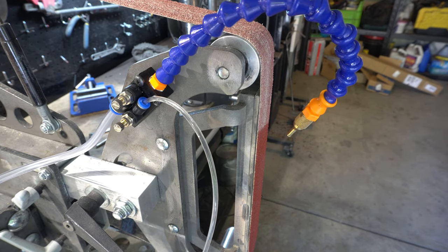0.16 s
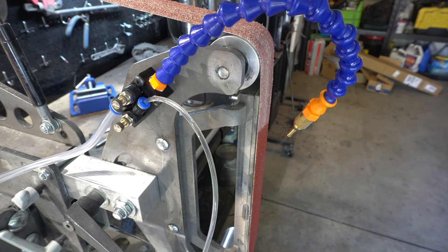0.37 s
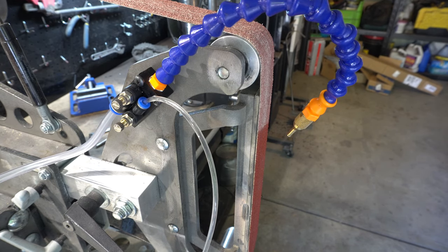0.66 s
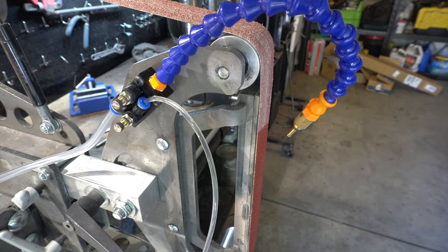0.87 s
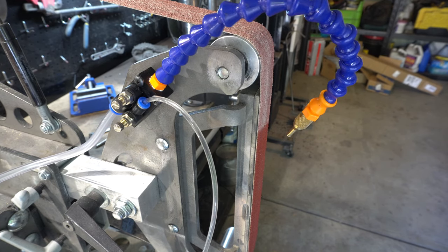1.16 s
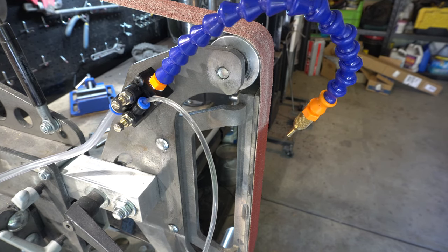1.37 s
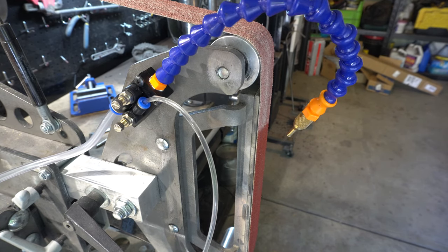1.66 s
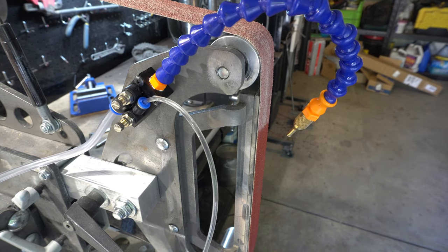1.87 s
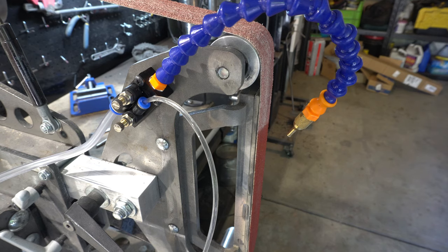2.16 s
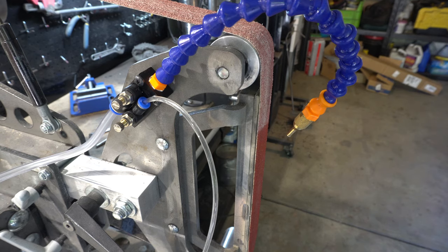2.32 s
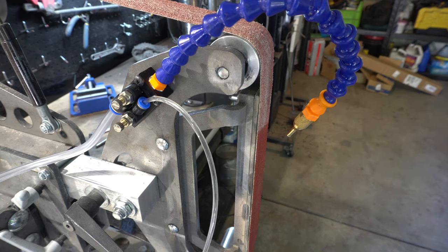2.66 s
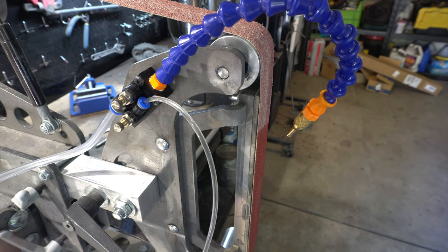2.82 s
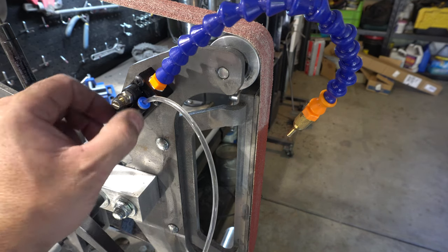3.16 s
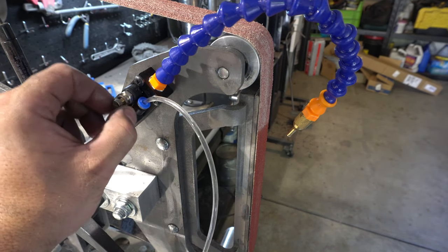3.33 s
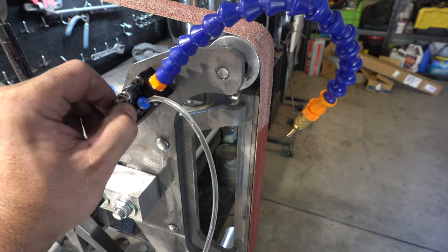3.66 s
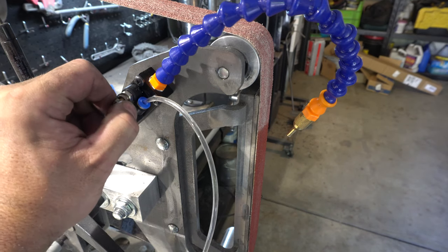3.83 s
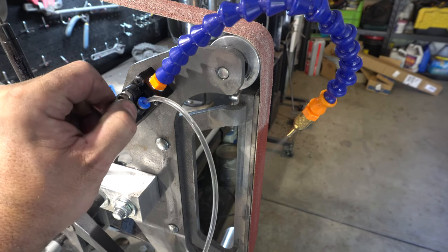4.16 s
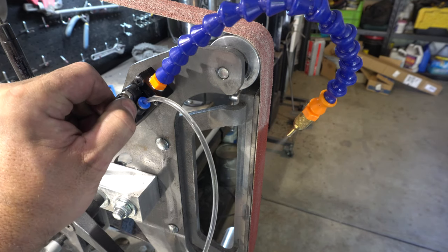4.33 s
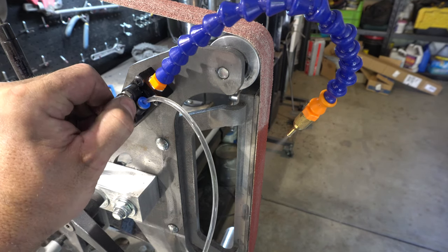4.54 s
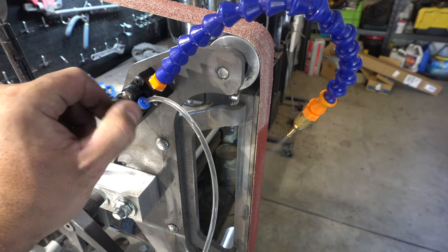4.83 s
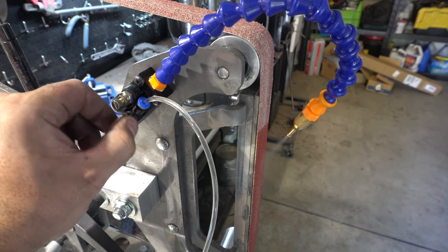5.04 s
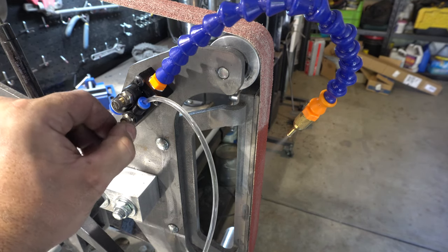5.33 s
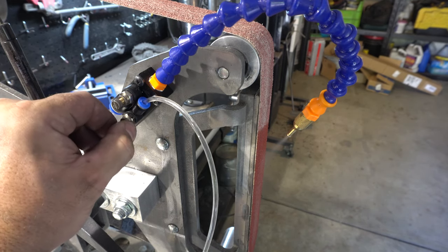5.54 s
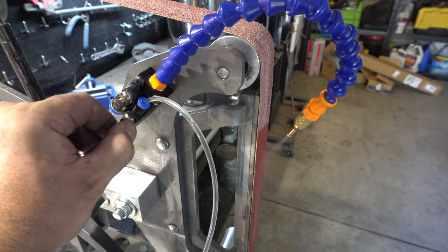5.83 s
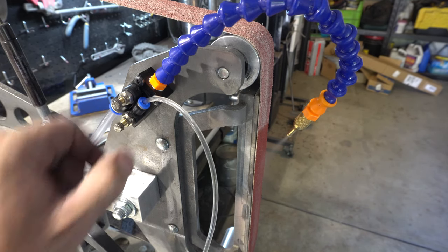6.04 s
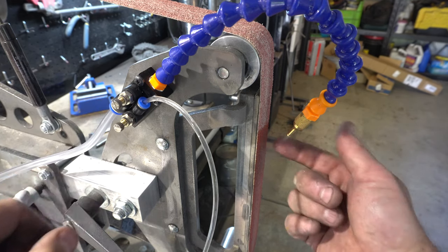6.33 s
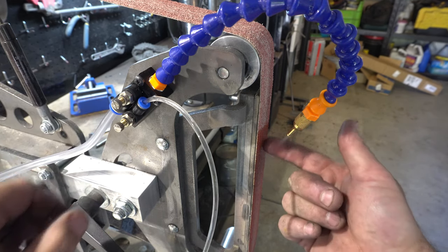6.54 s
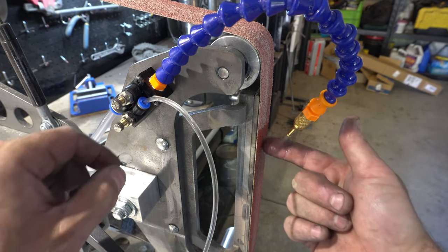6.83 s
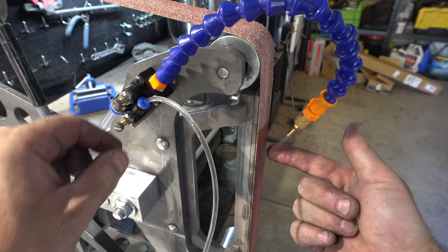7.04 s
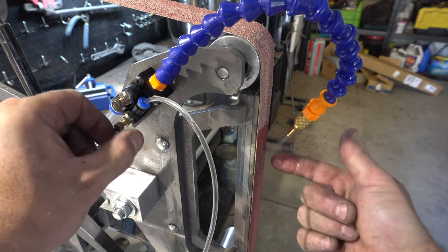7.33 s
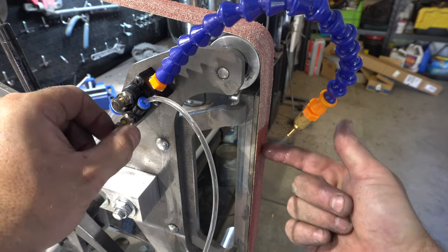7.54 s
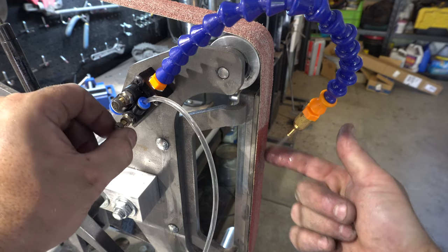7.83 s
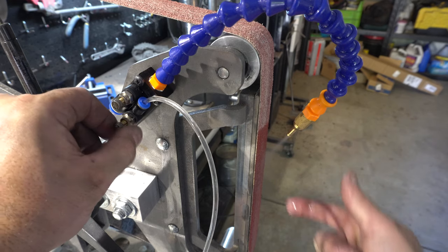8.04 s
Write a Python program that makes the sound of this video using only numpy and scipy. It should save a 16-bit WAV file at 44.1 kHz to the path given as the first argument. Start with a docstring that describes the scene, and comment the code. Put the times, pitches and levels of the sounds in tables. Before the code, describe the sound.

Close, continuous high air-spray hiss gets a touch sharper, then a finger held in the jet adds lower, uneven rushing and small puffs.

```python
"""A steady, bright hiss, a little stronger for its first moment: a compressed-air mister beside an idle belt
grinder in a workshop, heard at two microphone ports. It is noise coloured by jet spectra, and the steel frame
adds close echoes and a faint pipe-like ring. A hand turns the valve and the hiss brightens; then a fingertip
held in the spray adds a lower, fluttering rush of resonant noise, with puffs and flares.
Underneath lie noise rumble and air, two weak sine hums, arm rustle and soft handling bumps."""
import sys
import numpy as np
from scipy.fft import rfft, irfft, next_fast_len
from scipy.io import wavfile
from scipy.ndimage import map_coordinates

SR = 44100
rng = np.random.default_rng(int(sys.argv[2]) if len(sys.argv) > 2 else 0)


def transcribe(signal):
    """Save signal, clipped to [-1, 1], as a 16-bit WAV file at the path in sys.argv[1]."""
    frames = np.atleast_2d(signal).T
    limited = np.clip(frames, -1, 1)
    pcm = np.round(limited * 32767).astype(np.int16)
    wavfile.write(sys.argv[1], SR, pcm)


N = 360861
FFT_SIZE = next_fast_len(N)
TIME = np.arange(N) / SR   # s
HZ = np.arange(FFT_SIZE // 2 + 1) * SR / FFT_SIZE

# Low workshop rumble, and room air close by; spectra before band limits: pitch_hz [Hz], level_db [dB per Hz]
RUMBLE_SPECTRUM = [(15, -1), (30, -4), (50, -3), (90, -5), (130, -4.5), (190, -20), (400, -18)]
AIR_SPECTRUM = [(40, -24), (130, -12), (185, -2.5), (290, 1.5), (380, -1), (560, -6.5), (1000, -53),
                (3000, -54)]
# Swells of the hum above its faint steady level: middle_s [s], half_length_s [s], level_db [dB]
HUM_SWELLS = [(.35, 0.22, -67), (2.35, 0.13, -58), (3.62, 0.53, -55.5), (7.95, .3, -61)]
# Sleeve and hand moving: middle_s [s], half_length_s [s], level_db [dB]
RUSTLES = [(2.13, 0.053, -57), (3.1, 0.095, -62), (3.42, 0.25, -49.5), (5.05, 0.091, -59),
           (6.22, 0.25, -56), (7.41, 0.045, -56), (7.95, 0.053, -54)]
# Spectrum of that rustle before band limits: pitch_hz [Hz], level_db [dB per Hz]
RUSTLE_SPECTRUM = [(120, -31), (220, -5), (290, -0.5), (400, -6.5), (700, -10.5), (1300, -12), (2500, -41)]
# Soft handling bumps: start_s [s], level_db [dB]
BUMPS = [(1.0, -58), (2.04, -48), (3.03, -55), (3.95, -57)]
# Stereo width at the two ports: pitch_hz [Hz], side_minus_mid_db [dB]
STEREO_WIDTH = [(500, -27), (950, -35), (1350, -11.5), (1900, -27), (2700, -19.5), (3350, -14.5),
                (3900, -21), (4600, -13), (5750, -6.5), (6700, -8), (8050, -5), (10300, -4), (12600, -8),
                (13600, -8), (15500, -6)]
# Phase by which the right port leads: pitch_hz [Hz], lead_rad [radians]
PORT_LEAD = [(4800, 0), (5700, 0), (6700, 0.6), (7500, .4), (8050, 1), (9000, 0.77), (12300, 1.6),
             (13300, 1.7), (14300, 1.35), (15700, 1.56)]
# Balance of the spray: pitch_hz [Hz], left_minus_right_db [dB]
PORT_BALANCE = [(500, 0.8), (3200, -1.5), (4300, -0.2), (7800, 0), (8500, -2), (10200, -1), (13100, -2.5),
                (13900, -1.5), (15700, -2.5)]
# Near reflections, 0.5 to 2.8 m of extra path: delay_s [s], strength [gain against the direct sound]
NEAR_ECHOES = [(.002783, .2), (.00144, .04), (.008115, .06)]
# Resonances (and hollows, below 0 dB) between the frame plates: pitch_hz [Hz], width_hz [Hz], boost_db [dB]
FRAME_MODES = [(2980, 14, 7.5), (4090, 41, -6.5), (4300, 13, 4), (4745, 31, -0.5), (6100, 76, 3.5),
               (6640, 52, 8), (7000, 51, 3.5), (7040, 55, 0), (8160, 61, -3.5), (13500, 55, -3)]
# Resonances and hollows of the gap between hand and frame: pitch_hz [Hz], width_hz [Hz], boost_db [dB]
HAND_MODES = [(384, 85, 18), (920, 170, 6.5), (1480, 99, -7.5), (1700, 360, 5.5), (2830, 450, 2.5),
              (3643, 160, 5), (5400, 120, 1.5), (8100, 330, -0.5), (9900, 2800, 1.5), (13200, 500, 1),
              (15400, 1500, -3.5)]
# Resonances and hollow of the gap between nozzle and finger: pitch_hz [Hz], width_hz [Hz], boost_db [dB]
FINGER_MODES = [(3100, 320, 7), (3650, 150, 8), (5900, 280, -5)]
# Hollow heard just after the finger slips out: pitch_hz [Hz], width_hz [Hz], boost_db [dB]
SLIP_HOLLOW = [(2400, 1200, -4.5)]
# The free jet, and the jet broken by a finger; spectra before band limits: pitch_hz [Hz], level_db [dB per Hz]
FREE_JET = [(290, -45), (500, -28.5), (943, -24.5), (1280, -19), (1410, -17), (1540, -15), (1940, -10),
            (2110, -7.5), (4170, -0.5), (5970, -3), (7210, -4.5), (9340, -2.5), (12500, -1), (14800, 0.5),
            (15700, 1)]
BROKEN_JET = [(290, -56), (500, -26), (930, -10), (1300, -15), (1470, -4), (1910, -1), (3450, -11),
              (3710, -5), (4110, -3.5), (5800, -3.5), (6510, -4), (8570, -3.5), (10500, -2), (14200, -1),
              (15700, -3)]
# Finger in the spray: enter_s [s, middle of the move], leave_s [s, same], share [0-1 of the jet it breaks]
FINGER = [(6.32, 7.41, 0.96), (7.494, 7.937, 0.94)]
# Resonances of the rush on the fingertip, relative levels: pitch_hz [Hz], width_hz [Hz], level_db [dB]
RUSH_MODES = [(375, 79, -7), (928, 360, 1.5), (1266, 190, 1.5), (1660, 270, 2)]
# Puffs as the fingertip crosses the core of the jet: middle_s [s], half_length_s [s], level_db [dB]
PUFFS = [(6.3, 0.015, -50), (6.46, 0.019, -45.5), (7.35, 0.15, -48.5), (7.55, 0.032, -48.5),
         (7.78, 0.033, -45.5), (7.925, 0.022, -40.5)]
# Bands that flare as the finger changes its angle to the jet, levels before a common trim:
# middle_s [s], half_length_s [s], pitch_hz [Hz], width_hz [Hz], level_db [dB]
FLARES = [(6.358, 0.025, 4400, 2800, -22.5), (6.445, 0.019, 1850, 500, -32.5),
          (6.543, 0.038, 4120, 1500, -24.5), (6.62, 0.076, 2290, 905, -35), (6.85, 0.19, 13500, 800, -27),
          (7.18, 0.13, 10100, 1000, -25), (7.42, 0.065, 5450, 500, -29), (7.76, .12, 10650, 350, -28)]

# Background: the lull is when rumble and diffuse air die down, and stay lower
LULL_S, LULL_FADE_S = 4.08, 0.67
RUMBLE_DB, RUMBLE_DROP_DB = -56, 8
DIFFUSE_DB, DIFFUSE_DB_PER_S, DIFFUSE_DROP_DB = -65.5, 1.5, 35   # grows slowly until the lull
HUM_HZ, HUM_DB, FAN_HZ, FAN_DB = 63.7, -71.5, 87, -68
NEAR_AIR_DB = -63
BUMP_DECAY_S = 0.07
# Hand and finger: middles and lengths of their moves
HAND_S, HAND_APPROACH_S = 3.84, 2.1   # the hand cups the valve and colours the hiss
VALVE_S, VALVE_TURN_S = 3.78, 0.55
ENTER_S, LEAVE_S, SLIP_S = 0.35, 0.068, 0.11   # lengths only
RUSH_DB, RUSH_DB_PER_S = -45, 0.3   # at the first entry, and growth as the finger closes in
FLARE_TRIM_DB = -2
# Jet before the valve is turned, what opening it adds, and what the finger near the nozzle takes
HISS_DB, OPEN_HISS_DB, FINGER_HISS_LOSS_DB = -28.5, 0.6, 1.3
SIZZLE_DB, OPEN_SIZZLE_DB, FINGER_SIZZLE_LOSS_DB = -25.5, 2.08, 1.54
START_DB, SETTLE_S = 1.6, 0.18   # the hiss begins a little stronger and settles
CLUTTER = .26   # strength of the weak echoes around the frame, against the direct sound
CUTOFF_HZ = 15780


def from_db(db):
    """Turn decibels into gain."""
    return 10 ** (np.asarray(db) / 20)


def rms_one(x):
    """Scale to unit power."""
    return x / np.sqrt(np.mean(x ** 2) + 1e-20)


def at_hz(points):
    """Join a table's points on a log-frequency axis."""
    hz, value = np.transpose(points)
    return np.interp(np.log(HZ + 1), np.log(hz), value)


def filtered(x, gain):
    """Apply a frequency response."""
    return irfft(rfft(x, FFT_SIZE) * gain, FFT_SIZE)[..., :N]


def band(low_hz, high_hz, order=8):
    """Band-pass response, steeper with higher order."""
    low_cut = 1 + (low_hz / (HZ + 1)) ** (2 * order)
    high_cut = 1 + (HZ / high_hz) ** (2 * order)
    return 1 / np.sqrt(low_cut * high_cut)


def bell(hz, width):
    """Bell-shaped response of one resonance, 1 at its centre."""
    return 1 / (1 + (2 * (HZ - hz) / width) ** 2)


def boosts(modes):
    """Response of resonances and hollows standing on a flat base."""
    return from_db(sum(db * bell(hz, width) for hz, width, db in modes))


def drift(rate_hz):
    """Slow random movement with spread 1, made of low-passed noise."""
    return rms_one(filtered(rng.standard_normal(N), 1 / (1 + (HZ / rate_hz) ** 2)))


def ramp(middle_s, length_s):
    """A smooth move from 0 to 1."""
    return .5 + .5 * np.sin(np.pi * np.clip((TIME - middle_s) / length_s, -.5, .5))


def swells(rows):
    """Gain of a row of soft, bell-shaped swells."""
    return sum(from_db(db) * np.exp(-.5 * ((TIME - s) / half) ** 2) for s, half, db in rows)


def turbulence(gain, scatter=0):
    """Stereo noise of a given colour; its side part follows the width table plus any scatter; rms 1."""
    side_gain = gain * np.hypot(from_db(at_hz(STEREO_WIDTH)), scatter)
    mid, side = filtered(rng.standard_normal((2, N)), [gain, side_gain])
    return rms_one(np.array([mid + side, mid - side]))


def rumble_and_hum(lull):
    """Low noise that drops at the lull, with two sine hums whose phase wavers."""
    rumble = rms_one(filtered(rng.standard_normal(N), from_db(at_hz(RUMBLE_SPECTRUM)) * band(11, 400, order=2)))
    rumble = rumble * from_db(RUMBLE_DB - RUMBLE_DROP_DB * lull)
    # sqrt(2) gives the sines rms 1
    hum = np.sqrt(2) * np.sin(2 * np.pi * HUM_HZ * TIME + .5 * drift(1.8))
    fan = np.sqrt(2) * np.sin(2 * np.pi * FAN_HZ * TIME + 1.2 * drift(4))
    return rumble + hum * (from_db(HUM_DB) + swells(HUM_SWELLS)) + fan * from_db(FAN_DB)


def room_air(lull):
    """Near air as steady noise, and diffuse air as independent noise at each port."""
    near = from_db(NEAR_AIR_DB) * turbulence(from_db(at_hz(AIR_SPECTRUM)) * band(65, 3000, order=2))
    diffuse = rms_one(filtered(rng.standard_normal((2, N)), band(160, 990, order=2)))
    growth_db = DIFFUSE_DB_PER_S * np.minimum(TIME, LULL_S)
    return near + diffuse * from_db(DIFFUSE_DB + growth_db - DIFFUSE_DROP_DB * lull)


def arm_rustle():
    """Sleeve and hand rubbing: soft swells of low-mid noise."""
    return swells(RUSTLES) * turbulence(from_db(at_hz(RUSTLE_SPECTRUM)) * band(120, 2500, order=2))


def workshop():
    """The background: rumble, hums, room air and the rustle of an arm."""
    lull = ramp(LULL_S, LULL_FADE_S)
    return rumble_and_hum(lull) + room_air(lull) + arm_rustle()


def bumps():
    """Dull noise knocks that start at once and die quickly."""
    level = sum(from_db(db) * (TIME > s) * np.exp(-np.abs(TIME - s) / BUMP_DECAY_S) for s, db in BUMPS)
    return level * turbulence(band(170, 1200, order=3))


def frame(x, scatter_s=0.011, count=60):
    """The frame returns clear and weak echoes and rings; the ports differ in level and phase."""
    clutter = np.zeros(FFT_SIZE)
    delay_s = rng.uniform(.003, .025, count)   # about 1 to 8.5 m of extra path
    strength = rms_one(rng.standard_normal(count) * np.exp(-delay_s / scatter_s)) / np.sqrt(count)
    clutter[(delay_s * SR).astype(int)] = strength
    clear = sum(g * np.exp(-2j * np.pi * HZ * s) for s, g in NEAR_ECHOES)
    echoes = 1 + CLUTTER * rfft(clutter) + clear
    sides = np.array([[.5], [-.5]])   # left, right
    ports = from_db(at_hz(PORT_BALANCE) * sides) * np.exp(-1j * at_hz(PORT_LEAD) * sides)
    return filtered(x, echoes * boosts(FRAME_MODES) * ports)


def mirrored(x, strength, delay_s, sway_s, rate_hz):
    """Add a reflection from skin that never holds still, so its notches wander; offset the added power."""
    late_s = TIME - delay_s - sway_s * drift(rate_hz)
    echo = np.array([map_coordinates(channel, [late_s * SR], order=3, mode="nearest") for channel in x])
    return (x + strength * echo) / np.sqrt(1 + strength ** 2)


def finger_share():
    """Share of the jet that the finger breaks, 0-1."""
    visits = [share * ramp(enter, ENTER_S) * (1 - ramp(leave, LEAVE_S)) for enter, leave, share in FINGER]
    return np.clip(sum(visits), 0, 1)


def slipping():
    """Weight 0-1 of the moments when the finger lies just beside the jet."""
    return sum(ramp(leave, LEAVE_S) * (1 - ramp(leave + SLIP_S, SLIP_S)) for _, leave, _ in FINGER)


def fingertip(rough_db=1.0, wobble_db=1.0):
    """Spray rushes over the skin, puffs in the jet's core and flares as the finger changes its angle."""
    held = finger_share() * from_db(RUSH_DB + RUSH_DB_PER_S * (TIME - FINGER[0][0]))
    colour = sum(from_db(db) * bell(hz, width) for hz, width, db in RUSH_MODES) * band(290, 2700, order=3)
    flutter = from_db(rough_db * drift(70) + wobble_db * drift(16))
    rush = turbulence(colour) * (held + swells(PUFFS)) * flutter
    eddies = frame(turbulence(band(1700, 20000, order=4)))
    flares = 0
    for s, half, hz, width, db in FLARES:
        flares = flares + rms_one(filtered(eddies, bell(hz, width))) * swells([(s, half, db)])
    return rush + from_db(FLARE_TRIM_DB) * flares


def jet_levels():
    """Hiss and sizzle in dB: both rise as the valve opens and sink while the finger shields the nozzle."""
    opened = ramp(VALVE_S, VALVE_TURN_S)
    start_db = START_DB * np.exp(-TIME / SETTLE_S)
    shielded = ramp(FINGER[0][0], ENTER_S) * (1 - ramp(FINGER[-1][1], LEAVE_S))
    hiss_db = HISS_DB + start_db + OPEN_HISS_DB * opened - FINGER_HISS_LOSS_DB * shielded
    sizzle_db = SIZZLE_DB + start_db + OPEN_SIZZLE_DB * opened - FINGER_SIZZLE_LOSS_DB * shielded
    return hiss_db, sizzle_db


def jet_spray(stopped):
    """Mixing noise of the free and the broken jet, coloured by hand, frame and finger."""
    near = ramp(HAND_S, HAND_APPROACH_S)
    free = turbulence(from_db(at_hz(FREE_JET)) * band(440, 20800, order=4))
    free = (1 - near) * free + near * filtered(free, boosts(HAND_MODES))
    broken_colour = from_db(at_hz(BROKEN_JET)) * band(1730, 19400) * boosts(FINGER_MODES)
    broken = turbulence(broken_colour, scatter=0.22)
    spray = frame(np.sqrt(1 - stopped) * free + np.sqrt(stopped) * broken)
    spray = filtered(spray, boosts([(12350, 1100, -3.5)]))   # a hollow in the treble
    # the finger mirrors the spray, about 10 cm of extra path
    spray = mirrored(spray, 0.24 * stopped, delay_s=0.000294, sway_s=3e-5, rate_hz=6.5)
    return spray + slipping() * filtered(spray, boosts(SLIP_HOLLOW) - 1)


def jet(flutter_db=0.41, finger_flutter_db=0.28, spit_db=0.58, split_hz=7200):
    """The mister: uneven water feed makes hiss and sizzle flutter, more so against the finger."""
    stopped = finger_share()
    spray = jet_spray(stopped)
    hiss = filtered(spray, band(1, split_hz, order=4) ** 2)
    sizzle = spray - hiss
    # each level is set on the mono sum of the spray within its own band
    hiss_db, sizzle_db = jet_levels()
    hiss_gain = from_db(hiss_db) / np.std(filtered(spray.mean(0), band(2600, 6500)))
    sizzle_gain = from_db(sizzle_db) / np.std(filtered(spray.mean(0), band(8000, 15500)))
    depth_db = flutter_db + finger_flutter_db * stopped
    hiss = hiss * hiss_gain * from_db(depth_db * drift(8.2))
    sizzle = sizzle * sizzle_gain * from_db(depth_db * drift(13))
    feed = from_db(flutter_db * drift(18) + spit_db * drift(380))   # common flutter and fine spitting
    return feed * (hiss + sizzle)


def scene():
    """The room, handling, the finger in the spray and the mister."""
    return workshop() + bumps() + fingertip() + jet()


def record(dry):
    """Cut the top steeply."""
    return filtered(dry, 1 / (1 + (HZ / CUTOFF_HZ) ** 600))


dry = scene()
out = record(dry)
transcribe(out)
```